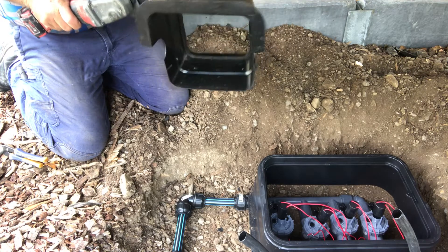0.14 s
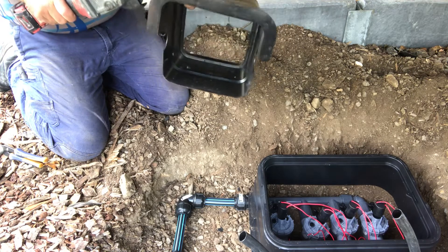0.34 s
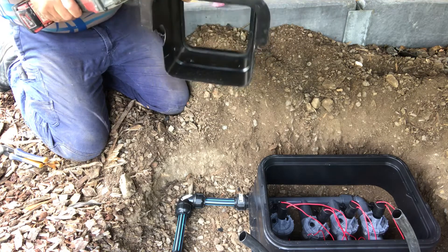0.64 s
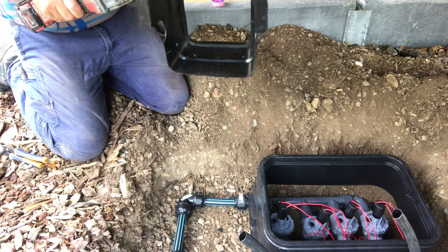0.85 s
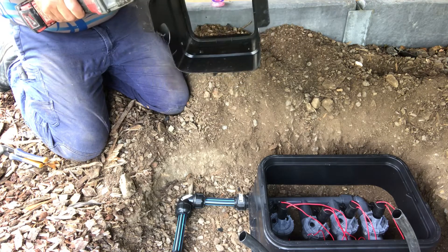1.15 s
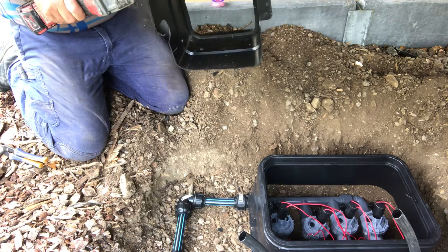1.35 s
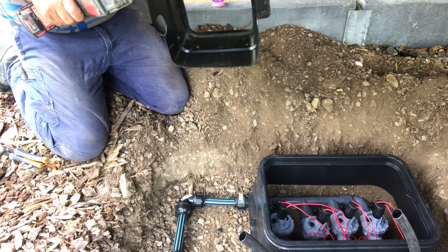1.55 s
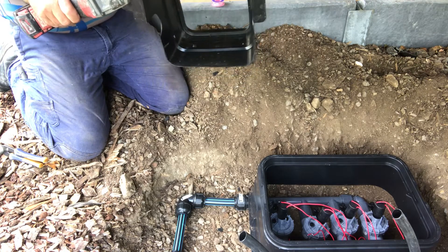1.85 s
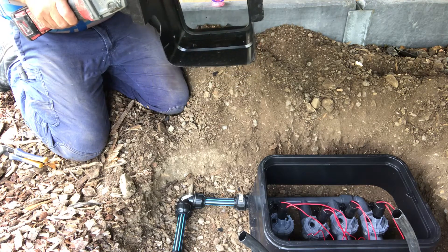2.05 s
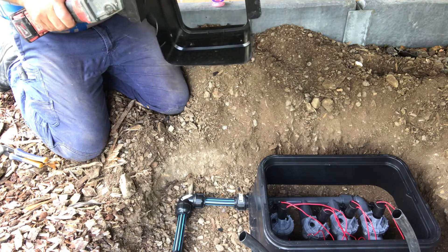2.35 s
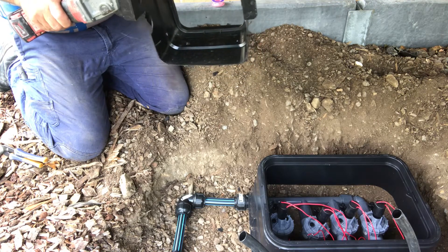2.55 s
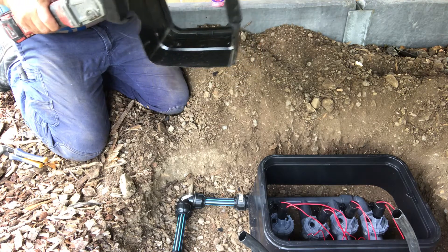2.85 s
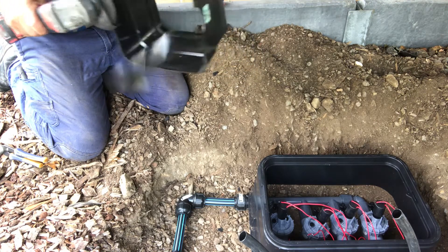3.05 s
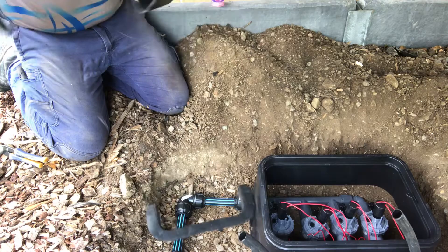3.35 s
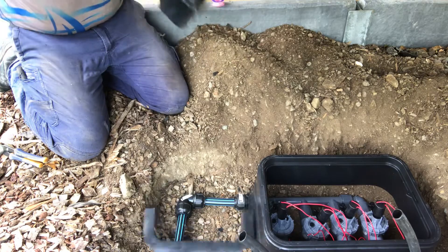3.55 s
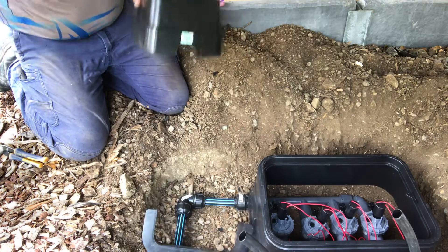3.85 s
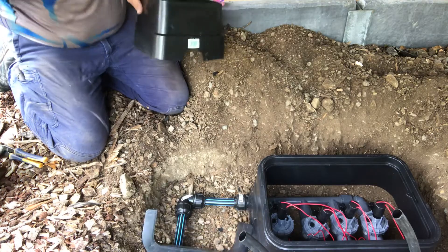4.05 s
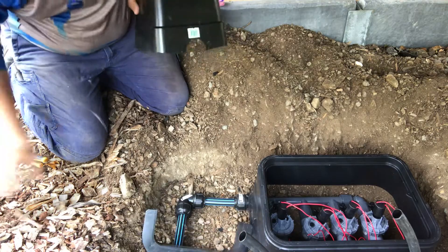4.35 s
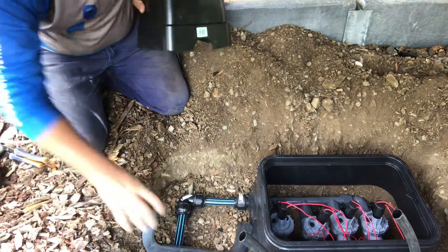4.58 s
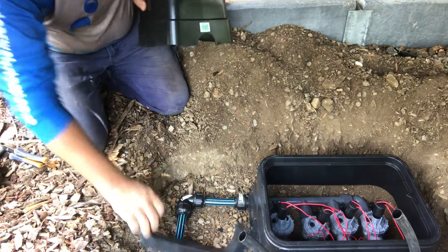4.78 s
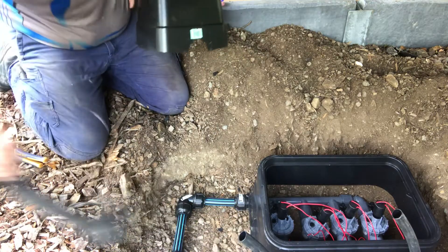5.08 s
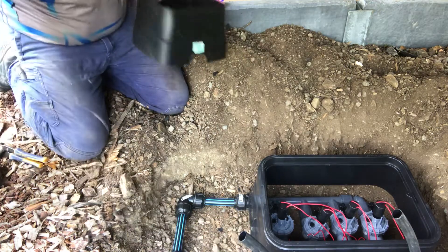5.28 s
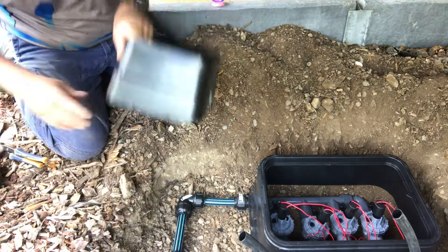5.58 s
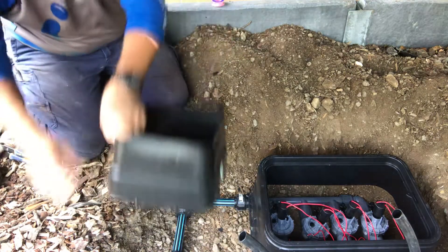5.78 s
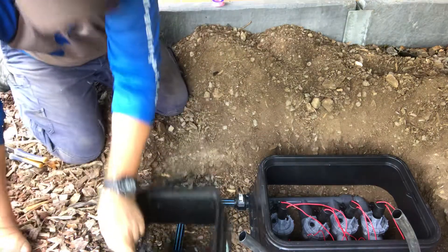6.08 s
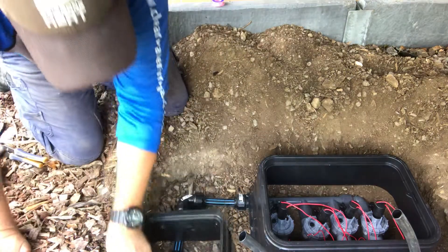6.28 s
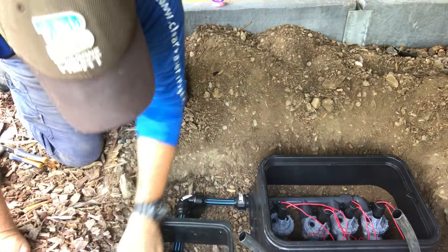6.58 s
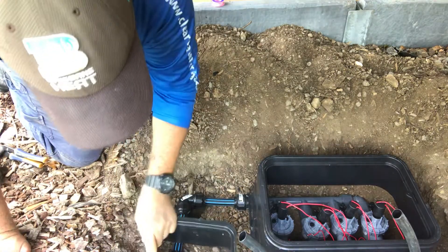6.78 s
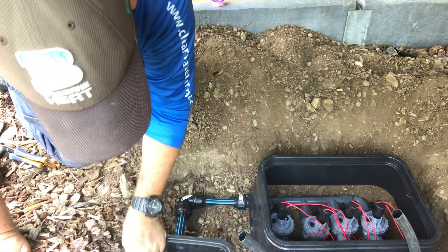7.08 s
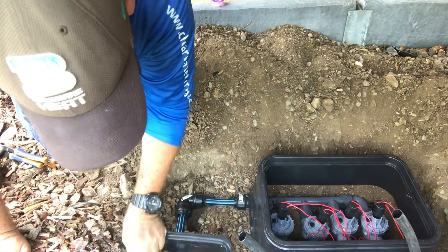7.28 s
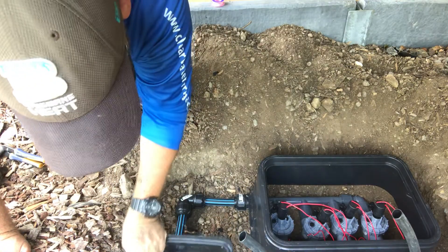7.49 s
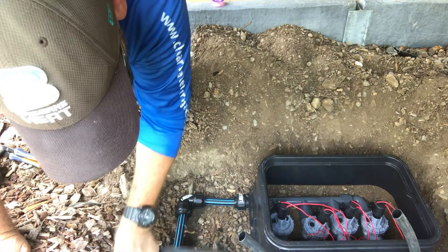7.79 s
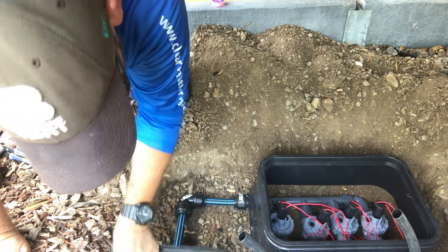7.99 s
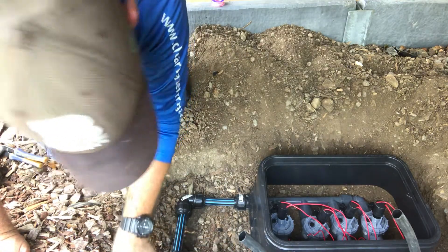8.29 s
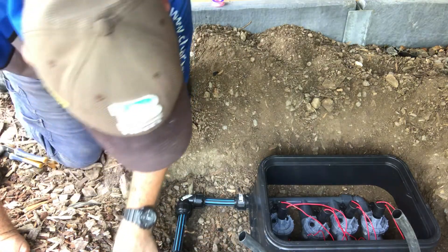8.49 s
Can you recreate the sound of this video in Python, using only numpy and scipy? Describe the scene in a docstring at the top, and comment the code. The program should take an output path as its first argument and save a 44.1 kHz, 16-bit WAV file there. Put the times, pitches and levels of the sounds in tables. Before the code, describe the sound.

A loud electric cutting disc dominates the first three seconds: a brief scrape, a rising free whine, then a long buzzing cut whose pitch falls and partly recovers. A sharp crack ends it; the tool races, then slows into a grainy gear rattle and stops. Quiet outdoor ambience emerges with a low far engine, hum and hiss, while a light plastic box is picked up, set down and bumped in loose soil. Close, dry, centred single-microphone sound.

```python
"""An angle grinder whines and rattles outdoors, cuts a plastic box, speeds up free and runs down to a stop;
knocks of off-cut and box sound from the end of the cut on, with ticks and rustles, over a far engine, a hum,
traffic and insect hiss. Disc speed drives rotor sines, fan whistle, gear noise, scrape and ringing box wall;
knocks and clicks ring modes; air and hiss are coloured noise. One microphone feeds both channels."""
import sys
import numpy as np
from scipy import signal
from scipy.fft import rfft, irfft, next_fast_len
from scipy.io import wavfile
from scipy.ndimage import uniform_filter1d, map_coordinates

SR = 44100
rng = np.random.default_rng(int(sys.argv[2]) if len(sys.argv) > 2 else 0)


def wav_record(signal):
    """Record a signal, one row per channel, as 16-bit PCM in the file named by sys.argv[1]."""
    frames = np.transpose(np.atleast_2d(signal))
    bounded = np.clip(frames, -1, 1)
    # unit amplitude maps onto the largest positive 16-bit level
    quanta = np.round(bounded * 32767).astype(np.int16)
    wavfile.write(sys.argv[1], SR, quanta)


N = 380565
T = np.arange(N) / SR

GEAR_RATIO, FAN_BLADES = 35 / 12, 39   # rotor turns per disc turn; blades on the rotor
LATE_TONES_FROM_S, STANDSTILL_S = 3.1, 4.79   # late tone levels fade in while the disc still speeds up
TONE_FLICKER_DB = 2.2

# two spells of disc in plastic: (time [s], scrape level [dB], chip spray re scrape [dB])
CUT_SPELLS = [
    [(0.0, -24, 3.5), (0.022, -25, -0.5), (0.096, -19.5, -5), (0.114, -34, 1), (0.13, -15, -7)],
    [(0.84, -26, -8), (0.86, -17, -6), (0.92, -22, -12.5), (0.98, -19, -1.5), (1.12, -20, -9),
     (1.24, -18, -4.5), (1.56, -18.5, -10), (1.72, -18.5, -8), (1.79, -20, -9), (2.08, -19.5, -7.5),
     (2.31, -16.5, -11.5), (2.55, -20.5, -6.5), (2.58, -20.5, -9.5), (2.86, -16, -11.5), (2.88, -17, -2.5),
     (2.9, -25, -21)],
]


def amp(db):
    """Decibels to amplitude factor."""
    return 10 ** (np.asarray(db) / 20)


def rms_one(x):
    """Scale to rms 1."""
    return x / np.sqrt(np.mean(x ** 2) + 1e-20)


def in_time(rows):
    """Interpolate each column over the scene; the first column is time."""
    s, *columns = np.transpose(rows)
    return [np.interp(T, s, c) for c in columns]


def at_hz(points, hz):
    """Read a (frequency, level) curve on a log frequency axis."""
    f, db = np.transpose(points)
    return np.interp(np.log(np.maximum(hz, 1)), np.log(f), db)


def gate(start_s, end_s, fade_s):
    """One between start and end, with smooth ramps."""
    ramp = np.minimum(T - start_s, end_s - T) / fade_s + .5
    return np.sin(np.pi / 2 * np.clip(ramp, 0, 1)) ** 2


def colour(x, spectrum):
    """Impose a spectrum on a white signal; rms 1."""
    size = next_fast_len(N)
    gain = amp(at_hz(spectrum, np.fft.rfftfreq(size, 1 / SR)))
    return rms_one(irfft(rfft(x, size) * gain, size)[:N])


def drift(rate_hz, at=np.arange(N)):
    """Slow random wander of rms 1 (two-pole low-passed noise), read at the given samples."""
    r = np.exp(-80 * np.pi * rate_hz / SR)   # one step per 40 samples
    noise = rng.standard_normal(N // 40 + 2002)
    slow = signal.lfilter([1], [1, -2 * r, r * r], noise)[2000:]
    return np.interp(at / 40, np.arange(len(slow)), rms_one(slow))


def ring(x, hz, t60_s):
    """Damped resonator: a unit click sets a sine of initial height 1 ringing."""
    r, w = amp(-60 / (t60_s * SR)), 2 * np.pi * hz / SR
    return signal.lfilter([0, np.sin(w)], [1, -2 * r * np.cos(w), r * r], x + 1e-18)


def burst(start_s, t60_s):
    """Start index and samples of a noise burst that dies away exponentially."""
    fade = amp(-60 * np.arange(round(.2 * SR)) / (t60_s * SR))
    at = round(start_s * SR)
    return at, (fade * rng.standard_normal(len(fade)))[:N - at]


def patchy(x, depth_db, rate_hz):
    """Third-octave bands swell and sink at random, each on its own."""
    size = next_fast_len(N)
    hz = np.maximum(np.fft.rfftfreq(size, 1 / SR), 1)
    band = np.clip(np.log2(hz / 300) * 3, 0, 17)   # in third octaves above 300 Hz
    spectrum = rfft(x, size)
    out = 0
    for k in range(18):
        share = np.clip(1 - abs(band - k), 0, 1)
        out = out + irfft(spectrum * share, size)[:N] * amp(depth_db * drift(rate_hz))
    return rms_one(out)


def repeating(turns, wear):
    """Noise bound to a turning surface: each turn repeats the last, slowly wearing into another pattern."""
    points = 300   # per turn
    noise = rng.standard_normal((int(turns[-1]) + 60, points))
    rim = signal.lfilter([1], [1, -wear], noise, axis=0)[50:]
    read = map_coordinates(rim.ravel(), [turns * points], order=3)
    return colour(read, [(20, 0), (9000, 0), (16000, 3)])


def rotor_tones(turns, speed, contact, slack):
    """Sines at multiples of rotor speed, loud where they cross casing resonances, plus a disc hum."""
    # casing response: (frequency [Hz], gain [dB])
    casing = [(300, -49), (700, -18), (1000, -8.5), (1150, -9.5), (1270, -4.5), (1450, -2.5), (1700, -9.5),
              (2300, -10.5), (2750, 6), (3000, -10.5), (3250, -21.5), (4250, -0.5), (5000, -30)]
    # (rotor multiple, level running free [dB], under load [dB], late [dB]), before the casing gain
    multiples = [(3, -30.5, -36.5, -37), (4, -28, -29, -38), (8, -29, -36, -38), (12, -30, -28, -40)]
    # brief rotor tones: (start [s], end [s], rotor multiple, level [dB])
    flares = [(0, .15, 8, -28), (0, .5, 4, -40), (.15, .9, 1, -48), (.466, .95, 3, -34),
              (1.37, 1.558, 8, -30), (2.946, 3.14, 3, -46), (3.13, 3.3, 3, -38), (3.12, 3.3, 6, -36),
              (3.2, 3.4, 8, -39), (3.45, 3.7, 8, -38), (3.517, 3.756, 3, -41.5), (3.9, 4.05, 12, -46),
              (4.05, 4.2, 12, -40), (4.02, 4.3, 4, -43), (4.205, 4.276, 5, -43), (4.335, 4.44, 30, -37),
              (4.427, 4.53, 12, -45), (4.505, 4.59, 30, -43), (4.5, 4.58, 39, -41)]
    slack_db, disc_hum_db = -46, -51   # tones sink as the gears go slack
    rotor = 2 * np.pi * GEAR_RATIO * turns
    late = gate(LATE_TONES_FROM_S, 99, 0.19)
    free = 1 - contact - late
    out = np.zeros(N)
    for k, free_db, load_db, late_db in multiples:
        k = round(k)
        level_db = at_hz(casing, k * GEAR_RATIO * speed) + TONE_FLICKER_DB * drift(11.0)
        level_db += free_db * free + load_db * contact + late_db * late + slack_db * slack
        out += amp(level_db) * np.sin(k * rotor + 0.89 * drift(39))
    for start, end, k, db in flares:
        level = amp(db + TONE_FLICKER_DB * drift(30)) * gate(start, end, .05)
        out += level * np.sin(round(k) * (rotor + .06 * drift(60)))
    hum_level = amp(disc_hum_db + TONE_FLICKER_DB * drift(8)) * free
    out += hum_level * np.sin(4 * np.pi * turns)   # twice the disc speed
    return np.sqrt(2) * out


def fan_whistle(turns, speed, contact):
    """Blade-passing sine of the rotor fan; its level follows its pitch."""
    # (pitch [Hz], level [dB])
    by_pitch = [(2500, -95), (6000, -66), (8500, -54), (10000, -46), (11500, -40), (13500, -43),
                (15000, -36), (16500, -40)]
    deep_cut = contact * (T > CUT_SPELLS[0][-1][0] + .1)
    level_db = at_hz(by_pitch, FAN_BLADES * GEAR_RATIO * speed)
    level_db += (4.6 + 3 * contact) * drift(25) - 8.5 * deep_cut   # sinks and breaks up in the cut
    phase = FAN_BLADES * 2 * np.pi * GEAR_RATIO * turns + 1.2 * drift(40)
    return np.sqrt(2) * amp(level_db) * np.sin(phase)


def tooth_clicks(turns, speed, slack):
    """Loose teeth click at random as the gears slow and ring the gear case."""
    # gear case modes: (frequency [Hz], level [dB], t60 [s])
    case_modes = [(1550, -9, 0.015), (2900, -6, .012), (4200, -2, 0.016), (4520, -1, .018),
                  (4720, 0, 0.018), (5350, -8, .012)]
    top_clicks_per_s, level_db, spread_db = 2200, 4, 2.0   # level re rattle
    struck = rng.random(N) < top_clicks_per_s * np.clip(speed / 40, .5, 1) / SR
    clicks = struck * amp(spread_db * np.minimum(rng.exponential(1, N), 3.5))
    rung = sum(amp(db + 4.4 * drift(16)) * ring(clicks, hz, t60) for hz, db, t60 in case_modes)
    level = slack * np.clip(speed / 35, 0, 1) * amp(level_db + 2.0 * drift(12))
    return level * (1 + 0.14 * np.sin(2 * np.pi * turns)) * rms_one(rung)


def gear_rattle(turns, speed, contact, slack):
    """Tooth noise bound to disc and rotor turns, rougher when slack, direct and through the housing."""
    # tooth noise spectrum: (frequency [Hz], relative density [dB])
    tooth_spectrum = [(120, -54.5), (250, -17), (500, -13), (900, -7.5), (1250, -5.5), (1800, -4),
                      (2600, -1), (4300, -6), (4950, -4), (5500, -1), (6500, -2), (7600, -11.5),
                      (10000, -21), (15900, -61.5)]
    # housing resonances: (frequency [Hz], width [Hz], level [dB])
    housing_modes = [(1500, 350, -9), (2020, 150, -6), (2700, 250, -4), (3600, 300, -8), (4300, 350, -1),
                     (4700, 250, -2), (5700, 700, -4), (11300, 500, -7)]
    bound = .55 * repeating(turns, .85) + .45 * repeating(GEAR_RATIO * turns / 3, .85)
    teeth = (1 - slack) * bound + (.7 + .3 * slack) * rng.standard_normal(N)
    teeth *= 1 + slack * (0.34 * np.sin(2 * np.pi * turns) + 0.21 * drift(98))   # loose teeth knock unevenly
    broad = colour(teeth, tooth_spectrum)
    peaks = sum(amp(db) * rms_one(ring(broad, hz, 2.2 / width)) for hz, width, db in housing_modes)
    housing = .5 + 1.0 * slack   # loose teeth ring the housing more
    mixed = (broad + housing * rms_one(peaks)) / np.sqrt(1 + housing ** 2)
    rattle = patchy(mixed, depth_db=1.1, rate_hz=14.0)
    rattle *= 1 - 0.36 * contact   # load takes up the play
    return rattle + tooth_clicks(turns, speed, slack)


def cooling_air():
    """Fan air as patchy coloured noise."""
    # (frequency [Hz], relative density [dB])
    air_spectrum = [(4000, -30), (7000, -3), (9500, -3), (10500, -6), (11400, -1), (12500, -4), (15900, -7)]
    return patchy(colour(rng.standard_normal(N), air_spectrum), depth_db=2.5, rate_hz=8.9)


def motor(turns, speed, contact):
    """Rotor tones, fan whistle, gear rattle and cooling air, all following the disc speed."""
    # (disc speed [turns/s], rattle level before load and clicks [dB], air level [dB])
    running = [(2.985, -42, -62), (9.7, -38, -57), (22.1, -38.5, -66), (48, -35, -48), (90, -29, -44),
               (117, -26.5, -35.5), (127, -24.5, -38.5), (139.8, -22, -33)]
    slack = np.clip(1.3 - speed / 70, 0, 1)   # slowing gears lose their preload
    speeds, *levels = np.transpose(running)
    rattle_db, air_db = [np.interp(speed, speeds, db) for db in levels]
    sound = rotor_tones(turns, speed, contact, slack) + fan_whistle(turns, speed, contact)
    sound += amp(rattle_db) * gear_rattle(turns, speed, contact, slack)
    sound += amp(air_db) * cooling_air()
    return gate(-1, STANDSTILL_S, 0.096) * sound


def cutting(turns, speed, contact):
    """Rim grit passes once a turn, so part of the scrape repeats, more as the disc slows; chips spray."""
    # scrape spectrum: (frequency [Hz], relative density [dB])
    scrape_spectrum = [(90, -52), (160, -44.5), (250, -20.5), (450, -10), (800, -13.5), (1350, -0.5),
                       (2000, -6), (2900, -7), (3600, -5.5), (4500, -4.5), (6300, -6), (7500, -14.5),
                       (9000, -43)]
    # chip and grit spray spectrum: (frequency [Hz], relative density [dB])
    spray_spectrum = [(5000, -19.5), (7500, 1), (9500, 5.5), (10600, -3), (12000, 1), (14000, 0),
                      (15900, 3)]
    # harder bite once a turn: (time [s], depth [0-1])
    beat = [(0, 0.04), (.9, 0.15), (1.25, 0.06), (1.7, 0.03), (1.8, 0), (2.8, 0), (2.9, 0)]
    repeat_free, repeat_per_sag = 0.31, 0.017   # repeating share; gain per turn/s of speed lost
    level_db, spray_db = in_time(np.concatenate(CUT_SPELLS))
    rim = repeating(turns, .93)
    repeat = np.clip(repeat_free + repeat_per_sag * (speed.max() - speed), .3, .8)
    wobble = 1 + np.clip(in_time(beat)[0], 0, 1) * np.cos(2 * np.pi * turns)
    scrape = wobble * (np.sqrt(repeat) * rim + np.sqrt(1 - repeat) * rng.standard_normal(N))
    spray = wobble * (.8 * rim + .6 * rng.standard_normal(N))
    mixed = colour(scrape, scrape_spectrum) + amp(spray_db) * colour(spray, spray_spectrum)
    return contact * amp(level_db) * patchy(mixed, depth_db=1.5, rate_hz=6.0)


def wall(turns, speed, contact):
    """Each disc multiple sounds as the box wall resonates at its pitch; some sing as the grip shifts."""
    # wall resonances: (frequency [Hz], width [Hz], level [dB])
    resonances = [(213, 66, -55), (395, 81, -41), (466, 23, -44.5), (604, 66, -51.5), (1006, 120, -36.5),
                  (1450, 200, -51), (1910, 880, -60.5), (2210, 250, -39.5), (2742, 100, -36.5),
                  (3806, 120, -53.5), (4320, 110, -35), (4580, 59, -36.5)]
    # singing multiples: (start [s], end [s], disc multiple, level [dB])
    singing_spells = [(0, 0.1, 15, -32.5), (0, 0.075, 4, -34), (0, .1, 37, -35), (0.868, 1.116, 10, -40),
                      (0.907, 1.036, 11, -28), (0.874, 1.474, 11, -40), (1.01, 1.454, 3, -42.5),
                      (1.15, 1.268, 32, -26.5), (1.19, 1.284, 41, -24), (1.258, 1.425, 5, -31.5),
                      (1.274, 1.69, 27, -32), (1.283, 1.503, 12, -36), (1.3, 1.552, 1, -44.5),
                      (1.303, 1.62, 54, -27), (1.342, 1.456, 13, -26), (1.32, 1.456, 36, -26),
                      (1.367, 1.483, 38, -27.5), (1.36, 1.94, 2, -51.5), (1.395, 2.835, 2, -50.5),
                      (1.44, 1.637, 28, -22.5), (1.453, 1.732, 16, -24), (1.56, 1.663, 37, -25),
                      (1.65, 1.753, 30, -26.5), (1.49, 1.927, 22, -38.5), (1.507, 1.75, 21, -25),
                      (1.537, 1.722, 41, -29.5), (1.55, 1.692, 36, -40.5), (1.55, 1.826, 14, -34),
                      (1.56, 1.726, 13, -25), (1.56, 1.76, 6, -36.5), (1.57, 1.906, 11, -35),
                      (1.576, 1.697, 38, -35), (1.576, 1.72, 20, -32.5), (1.75, 2.91, 4, -41.5),
                      (1.902, 2.793, 5, -33.5), (1.97, 2.14, 36, -32), (1.98, 2.167, 41, -50),
                      (1.993, 2.18, 32, -33), (2.04, 2.338, 22, -32), (2.08, 2.26, 21, -33.5),
                      (2.117, 2.414, 27, -29), (2.167, 2.373, 28, -34.5), (2.172, 2.398, 23, -33),
                      (2.207, 2.416, 46, -23), (2.216, 2.33, 60, -29), (2.22, 2.53, 39, -45),
                      (2.29, 2.734, 13, -29.5), (2.44, 2.537, 51, -29), (2.658, 2.71, 14, -28),
                      (2.837, 2.88, 13, -33), (2.74, 2.88, 53, -41), (2.244, 2.635, 6, -29),
                      (2.33, 2.663, 41, -35), (2.364, 2.477, 14, -23), (2.567, 2.863, 31, -31),
                      (2.608, 2.84, 30, -42), (2.655, 2.71, 16, -22), (2.77, 2.884, 16, -24),
                      (2.643, 2.88, 54, -40), (2.68, 2.81, 36, -33), (2.684, 2.866, 46, -24.5),
                      (2.684, 2.883, 12, -36), (2.756, 2.86, 41, -30.5)]
    swell_db, swell_hz, multiples_end = 2.5, 4, 62   # sounds multiples 1 to 61
    neighbour_db = -11   # the multiples beside a singing one join in
    end = round((CUT_SPELLS[-1][-1][0] + .1) * SR)
    at = np.arange(0, end, 64)   # control samples
    out = np.zeros(N)
    shaken = (turns + .0032 * drift(70))[:end]   # the wall trembles against the disc
    singing = np.zeros((multiples_end + 4, len(at)))
    for start, stop, multiple, db in singing_spells:
        singing[round(multiple)] += amp(db) * gate(start, stop, 0.11)[at]
    singing[8:-1] += amp(neighbour_db) * (singing[7:-2] + singing[9:])
    for k in range(1, multiples_end):
        pitch = k * speed[at]
        steady = sum(amp(db) / (1 + (2 * (pitch - hz) / width) ** 4) for hz, width, db in resonances)
        slow, fast = drift(swell_hz, at), drift(29, at)
        sway = min(k / 12, 1)   # low multiples hold steadier
        gain = (steady * amp(swell_db * slow * sway) + singing[k]) * amp(2.4 * fast * sway)
        phase = rng.normal(np.pi / 2, 0.69)   # all are driven by the same high spot
        out[:end] += np.interp(np.arange(end), at, gain) * np.sin(2 * np.pi * k * shaken + phase)
    return np.sqrt(2) * contact * out


def struck_modes(contact, modes, tilt_db, pivot_hz, uneven_db, decay):
    """Contact noise rings modes, tilted in dB per octave about a pivot and struck unevenly."""
    out = 0
    for (hz, db, t60), u in zip(modes, uneven_db):
        out = out + amp(db + u + tilt_db * np.log2(hz / pivot_hz)) * ring(contact, hz, decay * t60)
    return rms_one(out)


def knocks():
    """Box and off-cut: a crack and rough contact, heard directly and through body and edge modes."""
    # (time [s], hollow body peak [dB], thin edge peak [dB], length factor,
    # body tilt [dB/octave], edge tilt [dB/octave]); tilts tell where and how hard it is struck
    hits = [(2.917, -46, -7.5, 1.3, 4, 3), (2.929, -19.5, -35, 1.1, 13, 0), (2.945, -25, -21, 0.58, 7, 0),
            (3.306, -42, 1, 0.69, 5, 1), (3.317, -22, -13, 0.67, 4, -4), (3.324, -22.5, -22, 0.84, 13, 3),
            (3.463, -44, -17, .6, 2, 6), (3.515, -40, -4.5, 0.6, 10, 8), (3.548, -50, -18, .4, 0, 4),
            (3.61, -45, -10, 0.45, 3, 7), (4.829, -55, -23.5, 0.6, 0, 3), (5.383, -41, -3, 0.82, 3, 2),
            (5.394, -28, -17, 1.3, 11, 2), (5.434, -39, -23, 0.7, 2, 2), (5.443, -42, -30, 1, 4, 1),
            (5.468, -48, -31, 1, 0, 1), (5.48, -45, -16, 0.66, -5, -1.5), (5.498, -36, -30.5, 1.4, 5, 0),
            (5.52, -55, -42, 0.91, 0, 4), (5.543, -51, -33, 3.1, 0, 1), (5.557, -53, -33, 2.1, 0, 8),
            (5.697, -42, -32.5, 1.4, -2, 4), (6.152, -42, -32.5, 0.73, 3, -2),
            (6.216, -20.5, -20.5, 0.61, -2, -2.5), (6.224, -27, -39, .6, -9, -11),
            (6.281, -37, -29.5, 0.94, -5, -8), (6.335, -37, -40, 1.5, 2, -5), (6.632, -46, -35, 1, 0, 0),
            (6.908, -35.5, -46, .6, -2, -6), (6.961, -21.5, -37, 0.57, 4, -5),
            (6.988, -34, -29.5, 0.61, 0, -2.5), (6.996, -38, -42, .6, 2, -6), (7.04, -40, -33, .6, -1, -6),
            (7.051, -37, -34, 0.83, 3, -3), (7.592, -36, -34, 2, 4, -4.5), (7.627, -30, -40, 1.4, 5, -6),
            (7.644, -17.5, -20.5, 0.64, 1, 0), (7.656, -30, -40, 0.52, -9, -5),
            (7.713, -18, -38, 0.62, -2, -4), (7.741, -14.5, -20.5, 0.52, 9, 0),
            (7.751, -23, -35, 0.8, -13, -9), (7.815, -48, -45, 1.3, 0, -3), (7.973, -34, -40, .8, 4, -2),
            (7.987, -40, -48, .8, -3, -4), (8.011, -55, -38, .5, 0, 6), (8.046, -28, -29, 0.62, -1, -4.5),
            (8.084, -24, -23.5, 0.87, 7, 2.5), (8.132, -30.5, -33.5, 1.1, 4, -4),
            (8.155, -31, -44, .8, -13, -2), (8.189, -50, -34, 1, 0, 7), (8.234, -41.5, -37, 1.6, 8, -1)]
    # hollow body modes: (frequency [Hz], level [dB], t60 before halving [s])
    body_modes = [(134, -16, 0.084), (250, -1.5, 0.17), (332, -3.5, 0.21), (465, -0.5, 0.08),
                  (577, 7.5, 0.039), (707, 3, 0.05), (855, -15, 0.085)]
    # thin edge modes: (frequency [Hz], level [dB], t60 before the factor 0.3 [s])
    edge_modes = [(1008, -24, 0.11), (1201, 3, 0.09), (1640, 14, 0.022), (2160, 8, 0.029),
                  (2500, 3.5, 0.022), (2860, 2, 0.032), (3220, -11, 0.052), (4280, -8, .04),
                  (5200, -6, 0.036), (5720, 3, 0.021)]
    body_soft_hz, edge_soft_hz = 800, 6900   # low-pass corners; edge tilt shifts the second
    out = np.zeros(N)
    thud = signal.butter(2, [130, 900], "band", fs=SR, output="sos")
    soft = signal.butter(3, body_soft_hz, fs=SR, output="sos")
    clack = signal.butter(2, [700, 4200], "band", fs=SR, output="sos")
    for s, body_db, edge_db, length, body_tilt_db, edge_tilt_db in hits:
        dull_hz = np.clip(edge_soft_hz * amp(2 * edge_tilt_db), 900, 16000)
        dull = signal.butter(2, dull_hz, fs=SR, output="sos")
        at, contact = burst(s, 0.094 * max(length, .2))
        contact += 0.034 * burst(s, 0.23)[1]   # rattling tail
        crack = np.sin(np.pi * np.arange(12) / 6)
        contact[:12] += 3.0 * amp(2 * min(edge_tilt_db, 0)) * crack
        uneven_db = rng.normal(0, 2.5, len(body_modes) + len(edge_modes))
        body = struck_modes(contact, body_modes, body_tilt_db, 400, uneven_db, .5)
        edge = struck_modes(contact, edge_modes, edge_tilt_db, 2000, uneven_db[len(body_modes):], .3)
        body = signal.sosfilt(soft, body + 0.22 * rms_one(signal.sosfilt(thud, contact)))
        edge = signal.sosfilt(dull, 2.3 * edge + rms_one(signal.sosfilt(clack, contact)))
        hit = amp(body_db) * body / abs(body).max() + amp(edge_db) * edge / abs(edge).max()
        out[at:at + len(hit)] += hit
    return out


def ticks_and_rustles():
    """Short noise ticks, first as the tool runs down, later dry and gritty; rustles of dense small grains."""
    # (time [s], level before the band-pass [dB])
    tick_hits = [(3.688, -26), (3.882, -28), (3.892, -30), (4.02, -35), (4.05, -32), (4.09, -27),
                 (4.164, -23), (4.227, -26), (5.5568, -47.5), (5.695, -49), (6.0023, -54), (6.1131, -43),
                 (6.2153, -53), (6.629, -38.5), (6.9033, -51), (7.04, -28.5), (7.508, -41.5), (7.6421, -58),
                 (7.7383, -38), (8.0841, -60), (8.188, -45), (8.58, -53)]
    # cloth and soil: (start [s], length [s], level [dB])
    rustle_spells = [(5.99, 0.094, -61), (6.205, 0.034, -54), (6.62, .04, -67), (6.88, .07, -67),
                     (7.022, 0.1, -61), (7.448, 0.073, -69), (7.578, 0.055, -63), (7.718, 0.034, -63),
                     (7.83, .02, -68), (7.9, .02, -68), (8.13, .07, -68), (8.453, .06, -67),
                     (8.568, 0.033, -66)]
    tick_t60_s, grains_per_s = 0.023, 1500
    rustle_start_s, rustle_db, rustle_swing_db = 5.44, -82, 7
    out = np.zeros(N)
    for s, db in tick_hits:
        at, tick = burst(s, tick_t60_s)
        out[at:at + len(tick)] += amp(db) * tick
    out = signal.sosfilt(signal.butter(1, [2500, 11000], "band", fs=SR, output="sos"), out)
    grains = (rng.random(N) < grains_per_s / SR) * amp(4.8 * np.minimum(rng.exponential(1, N), 4))
    grains = grains * rng.choice([-1, 1], N)
    rustle_spectrum = [(1500, -27), (5000, 2), (9000, -4), (16000, -6)]
    rustle = colour(grains + .3 * rng.standard_normal(N), rustle_spectrum)
    level = gate(rustle_start_s, 99, .05) * amp(rustle_db + rustle_swing_db * drift(4.9))
    level += sum(amp(db) * gate(s, s + length, .025) for s, length, db in rustle_spells)
    return out + level * rustle


def hum():
    """A low sine, wavering in pitch and level."""
    # (time [s], level [dB])
    hum_level = [(0.0, -32), (0.26, -44), (0.31, -42), (0.41, -37), (0.5, -45), (0.77, -38), (0.81, -51),
                 (1.01, -37), (2.35, -41.5), (2.45, -52), (2.52, -40), (3.22, -41.5), (4.16, -38),
                 (6.08, -41.5), (6.13, -37), (6.92, -40.5), (6.97, -47), (7.38, -39.5), (7.47, -49),
                 (7.52, -43), (7.69, -46), (7.84, -38), (8.24, -46), (8.41, -37), (8.58, -40.5),
                 (8.63, -65)]
    centre_hz, width_hz = 63.5, 3.5
    phase = 2 * np.pi * np.cumsum(centre_hz + width_hz / 2 * drift(3)) / SR
    return amp(in_time(hum_level)[0]) * np.sin(phase) * np.sqrt(2) * amp(1.8 * drift(7))


def engine(gone):
    """A slow far engine: uneven soft puffs and rough noise ring the exhaust."""
    # exhaust modes: (frequency [Hz], level [dB], t60 [s])
    exhaust_modes = [(87, 6.5, 0.1), (100, -7, 0.33), (133.5, -4.5, 0.26), (158.1, -4, 0.35),
                     (207.6, -2, 0.12)]
    chugs_per_s, first_chug_s, level_db = 11, 0.029, -44.5
    cycles = chugs_per_s * (T - first_chug_s) + .03 * drift(2)
    firing = np.diff(np.floor(cycles), prepend=0) > 0
    puff = np.hanning(round(0.008 * SR))
    puffs = np.convolve(firing * amp(rng.normal(0, 3, N)), np.diff(puff))[:N]
    rough = rms_one(uniform_filter1d(rng.standard_normal(N), 40))
    source = rms_one(uniform_filter1d(puffs, 40)) + .8 * rough
    chug = rms_one(sum(amp(db) * ring(source, hz, t60) for hz, db, t60 in exhaust_modes))
    return amp(level_db) * (1 - gone) * chug


def far_hiss(gone):
    """Traffic and insects: coloured noise of wandering level that drops as the engine fades."""
    # (frequency [Hz], relative density [dB])
    hiss_spectrum = [(150, 5), (270, -3), (450, -4.5), (800, -6.5), (1150, -3.5), (1420, -8), (1780, -5),
                     (2200, -14), (4000, -19), (6900, -14), (7600, -22), (8500, -32), (15900, -45.5)]
    level_db, drop_db = -49.5, -4.5
    white = rng.standard_normal(N) * amp(1.0 * drift(9.7))
    high = signal.butter(4, 120, "high", fs=SR, output="sos")
    return amp(level_db + drop_db * gone) * colour(signal.sosfilt(high, white), hiss_spectrum)


def surroundings():
    """Hum, far engine and hiss behind the work."""
    engine_fades_s = 8.25
    gone = gate(engine_fades_s, 99, 0.052)
    return hum() + engine(gone) + far_hiss(gone)


def scene():
    """Drive the tool from disc speed and contact, add knocks, ticks, rustles and background."""
    # (time [s], disc speed [turns/s])
    spin = [(0, 113), (0.05, 115.8), (0.12, 121.7), (0.2, 130.7), (0.26, 135.2), (0.39, 140.5),
            (0.5, 142.7), (0.83, 145.1), (0.9, 143.0), (0.97, 140.6), (1.03, 136.9), (1.09, 134.7),
            (1.15, 131.2), (1.2, 129.6), (1.28, 126.2), (1.35, 122.5), (1.44, 118.0), (1.53, 114.0),
            (1.6, 113.0), (1.68, 111.3), (1.73, 110.3), (1.78, 107.0), (1.84, 106.0), (1.9, 104.4),
            (2.0, 102.0), (2.08, 101.2), (2.14, 101.1), (2.19, 101.3), (2.25, 102.1), (2.39, 102.2),
            (2.5, 104.7), (2.58, 106.5), (2.66, 108.3), (2.73, 110.9), (2.8, 113.2), (2.86, 114.6),
            (2.96, 125.6), (3.02, 131.5), (3.15, 139), (3.3, 143), (3.4, 139.4), (3.5, 130), (3.75, 111.2),
            (3.9, 100), (4.07, 88.4), (4.2, 70.5), (4.3, 60.5), (4.43, 47), (4.58, 30), (4.81, 4)]
    speed, = in_time(spin)
    turns = np.cumsum(speed) / SR
    first, second = CUT_SPELLS
    contact = gate(-1, first[-1][0], 0.047) + gate(second[0][0], second[-1][0], 0.012)
    tool = motor(turns, speed, contact) + cutting(turns, speed, contact) + wall(turns, speed, contact)
    mono = tool + knocks() + ticks_and_rustles() + surroundings()
    return np.array([mono, mono])


def record(dry):
    """The deep bass rolls off, peaks are rounded and the top is cut steeply."""
    cutoff_hz = 15850
    dry = signal.sosfilt(signal.butter(2, 40, "high", fs=SR, output="sos"), dry)
    rounded = .95 * np.tanh(dry / .95)
    return signal.sosfilt(signal.ellip(12, .3, 85, cutoff_hz, fs=SR, output="sos"), rounded)


dry = scene()
out = record(dry)
wav_record(out)
```